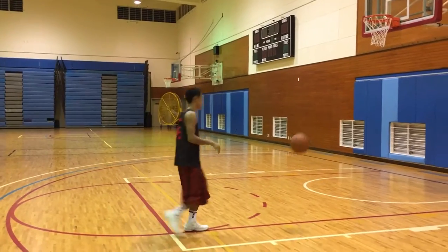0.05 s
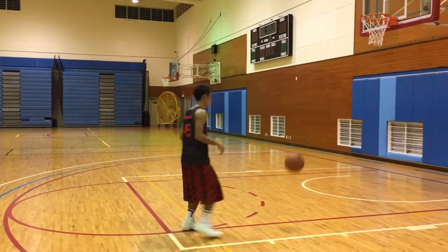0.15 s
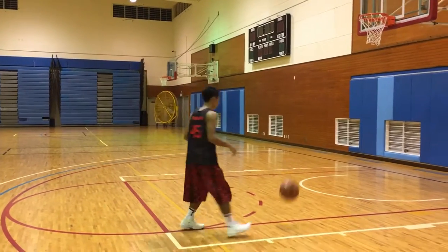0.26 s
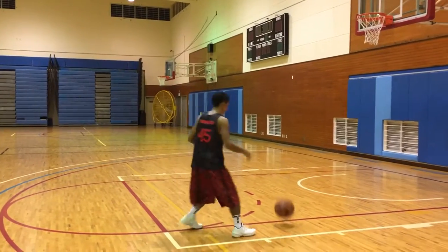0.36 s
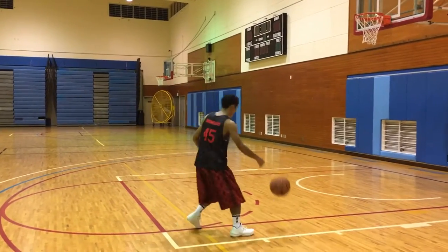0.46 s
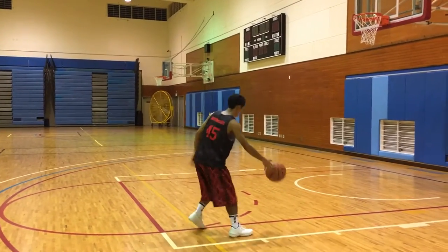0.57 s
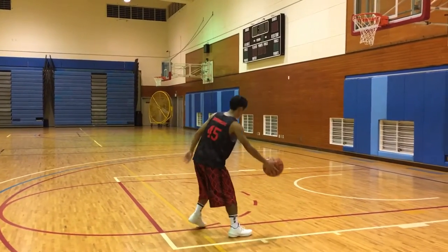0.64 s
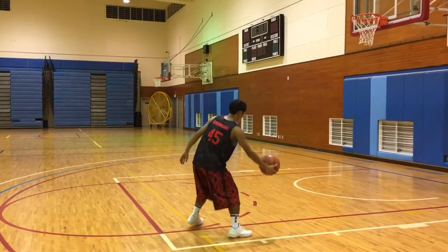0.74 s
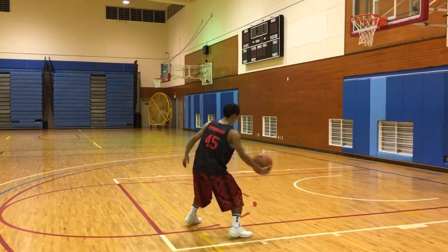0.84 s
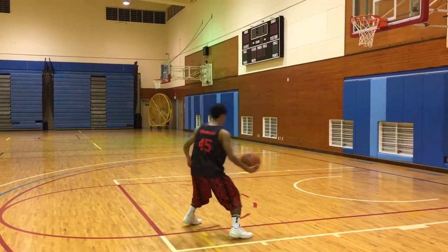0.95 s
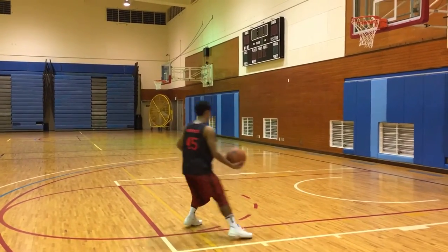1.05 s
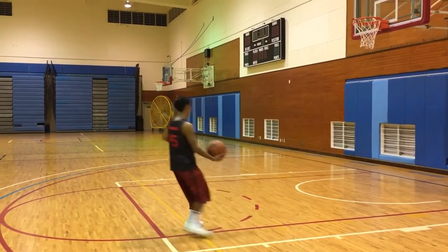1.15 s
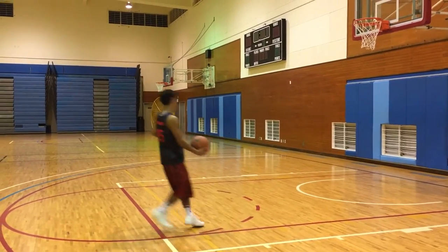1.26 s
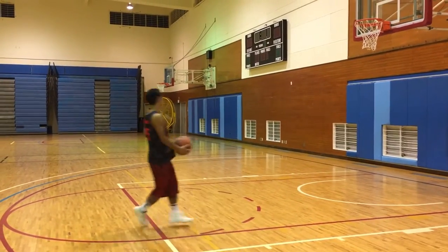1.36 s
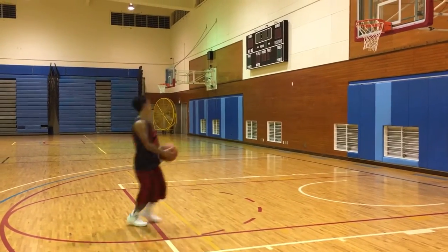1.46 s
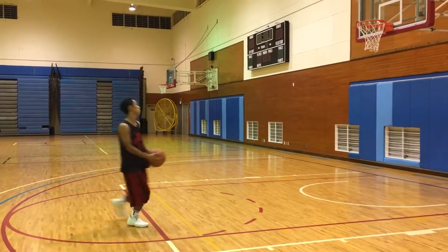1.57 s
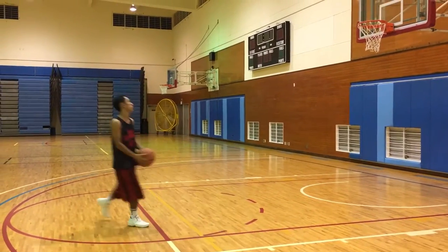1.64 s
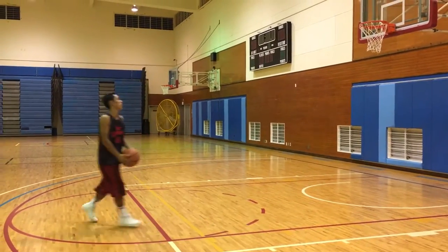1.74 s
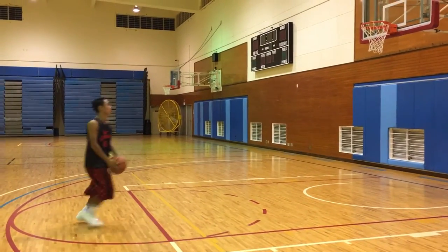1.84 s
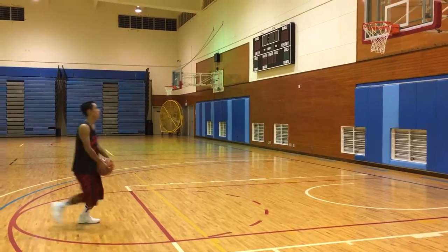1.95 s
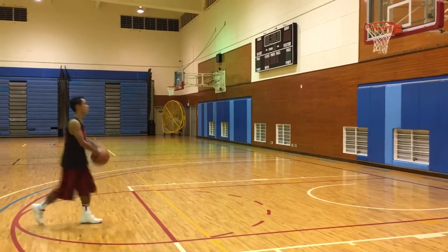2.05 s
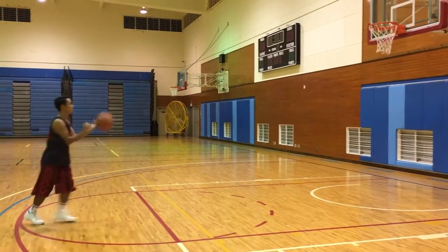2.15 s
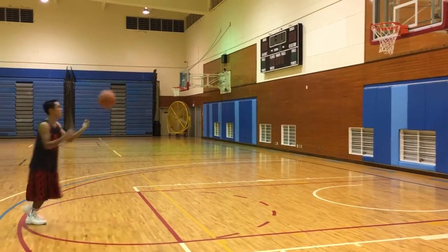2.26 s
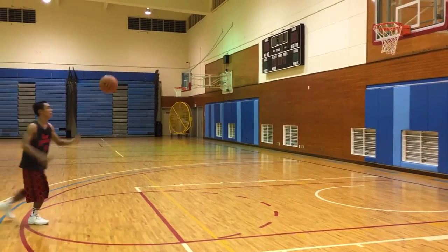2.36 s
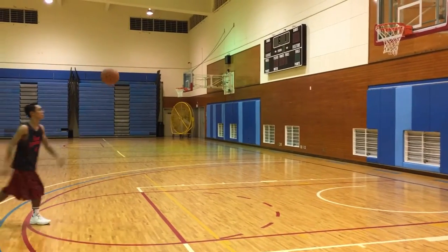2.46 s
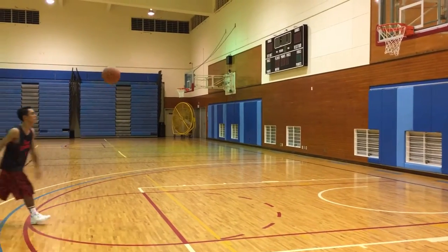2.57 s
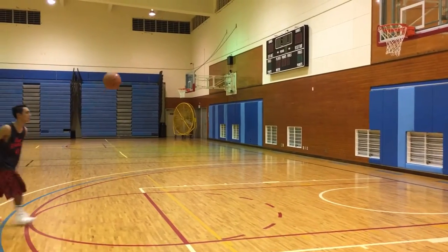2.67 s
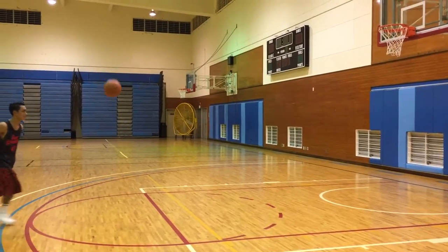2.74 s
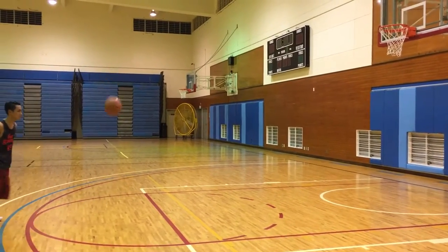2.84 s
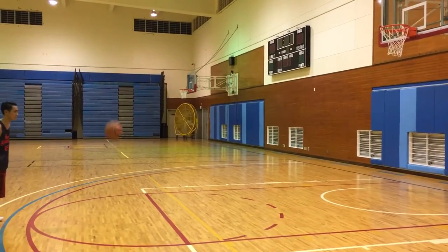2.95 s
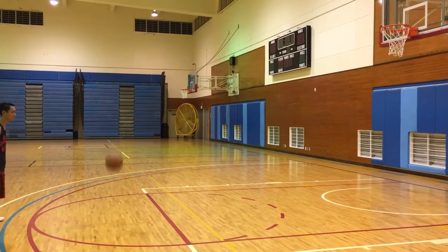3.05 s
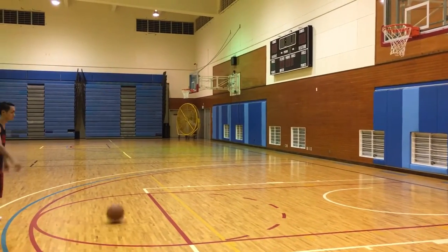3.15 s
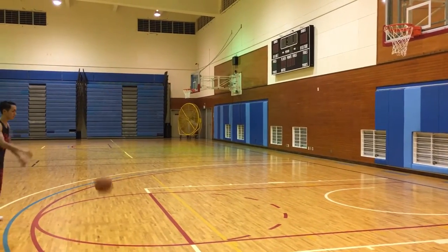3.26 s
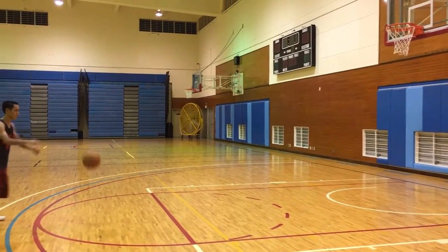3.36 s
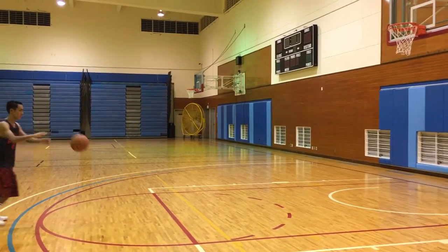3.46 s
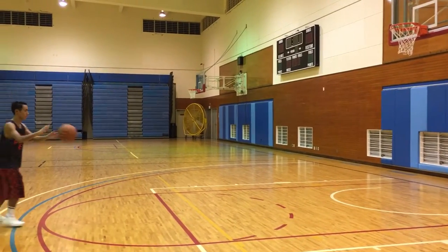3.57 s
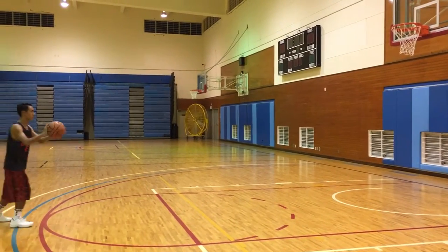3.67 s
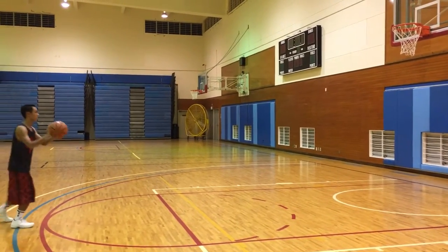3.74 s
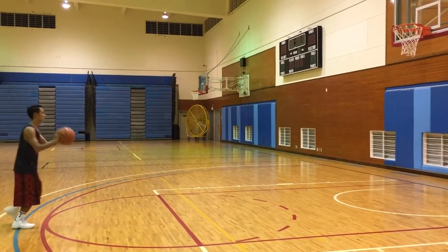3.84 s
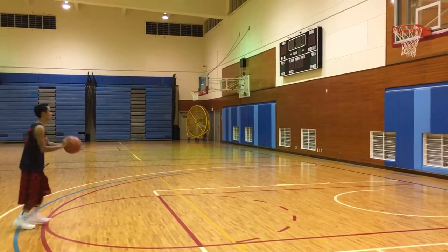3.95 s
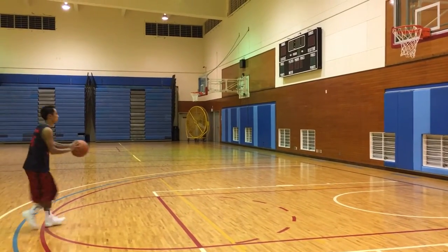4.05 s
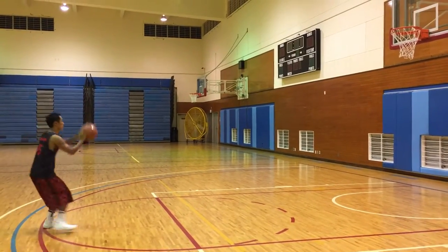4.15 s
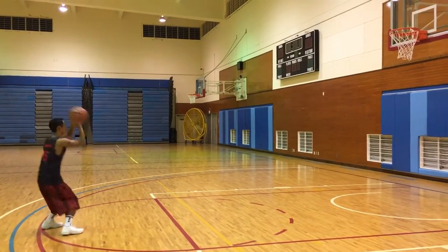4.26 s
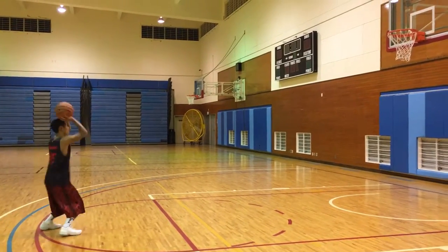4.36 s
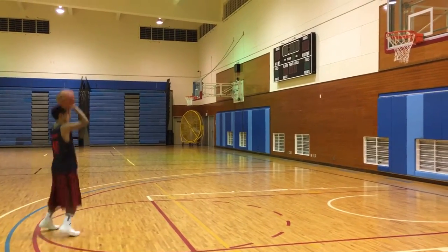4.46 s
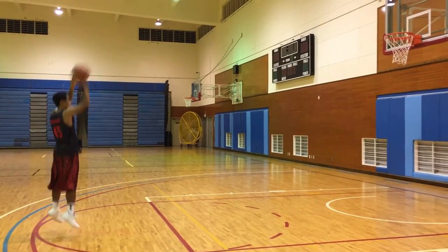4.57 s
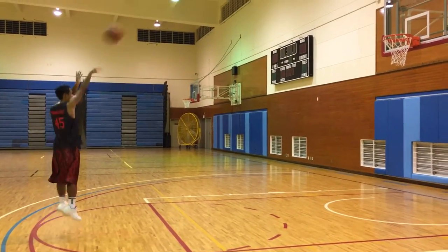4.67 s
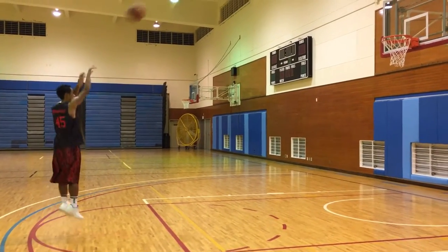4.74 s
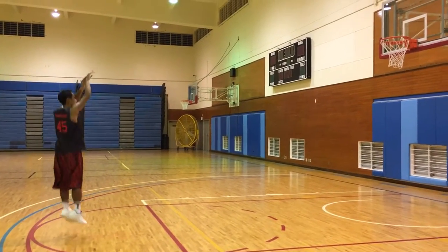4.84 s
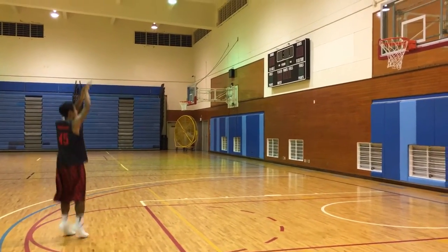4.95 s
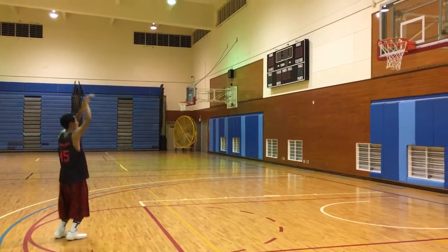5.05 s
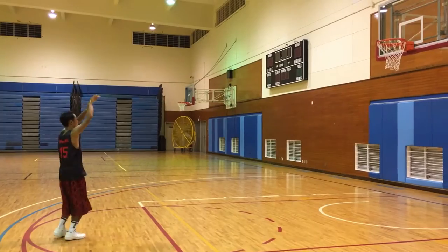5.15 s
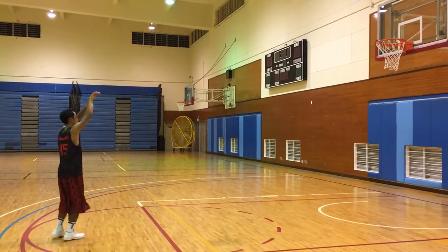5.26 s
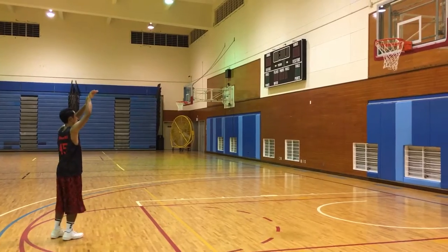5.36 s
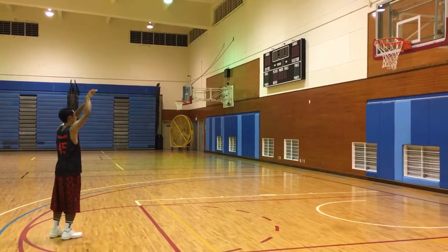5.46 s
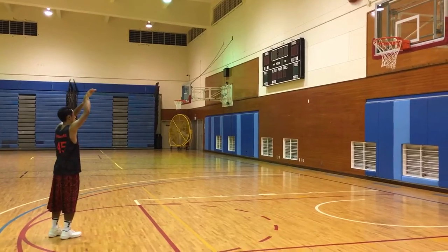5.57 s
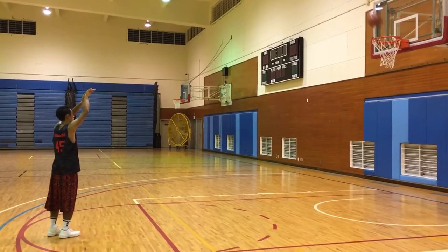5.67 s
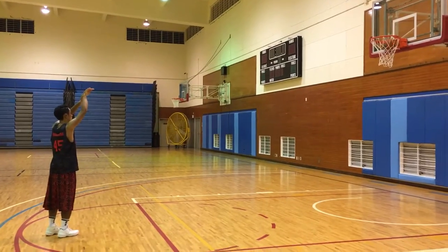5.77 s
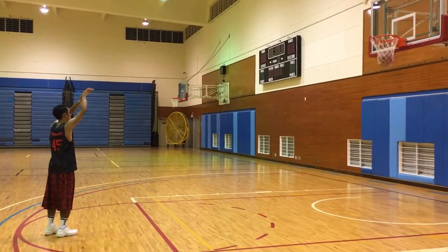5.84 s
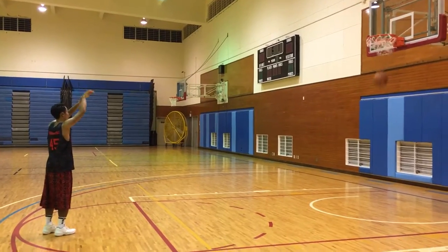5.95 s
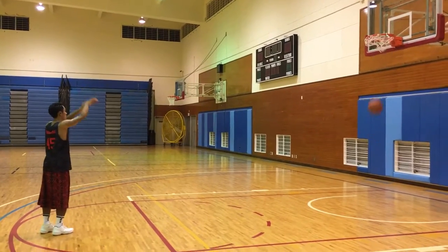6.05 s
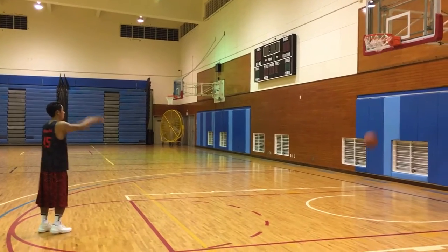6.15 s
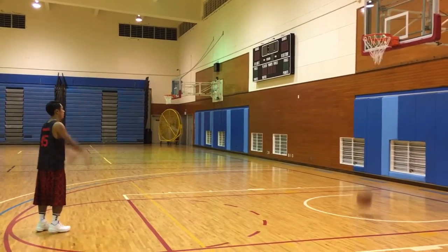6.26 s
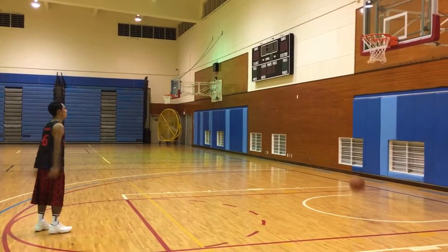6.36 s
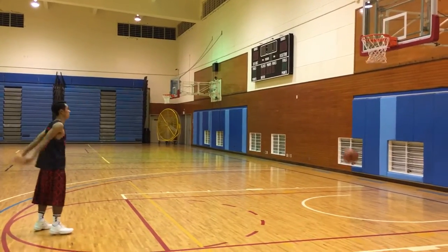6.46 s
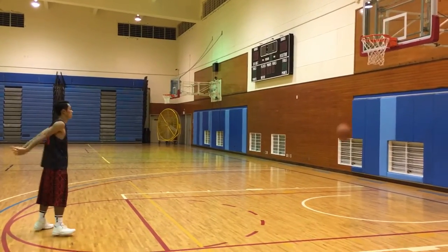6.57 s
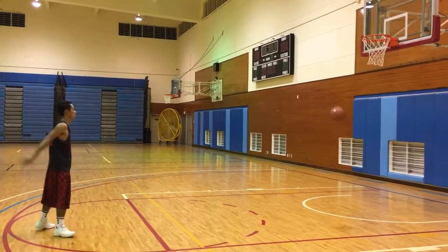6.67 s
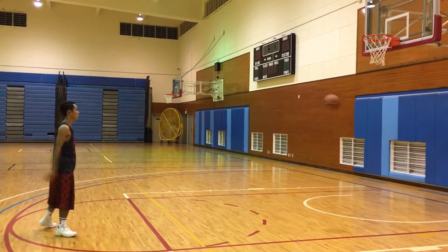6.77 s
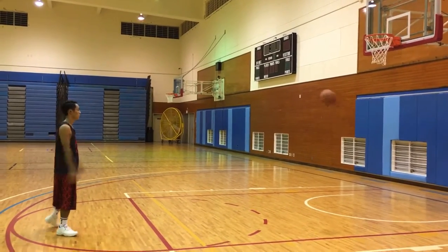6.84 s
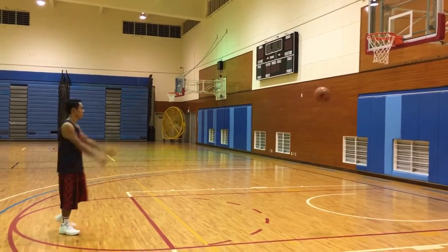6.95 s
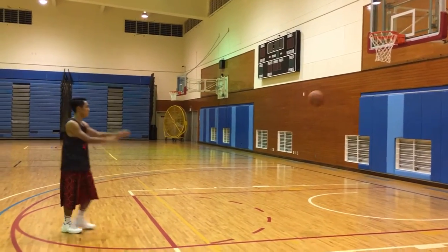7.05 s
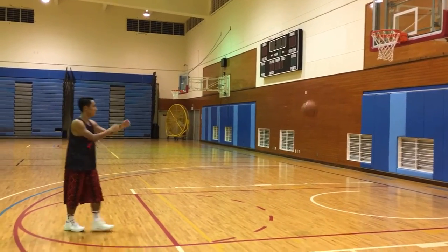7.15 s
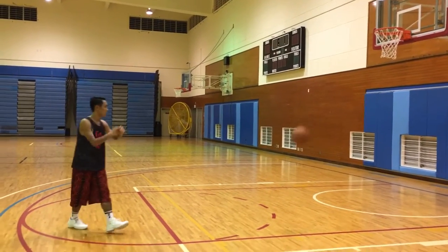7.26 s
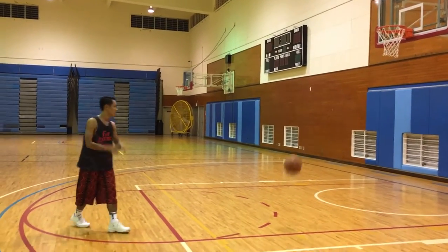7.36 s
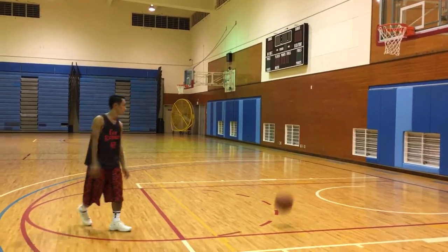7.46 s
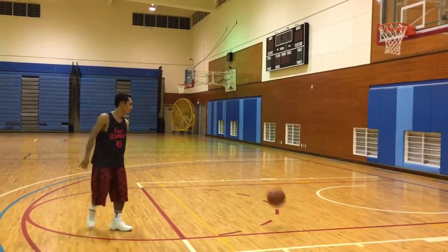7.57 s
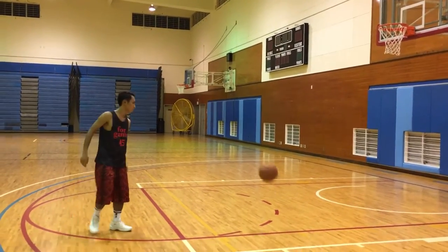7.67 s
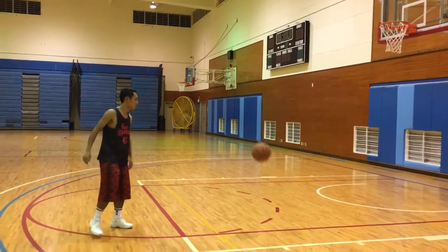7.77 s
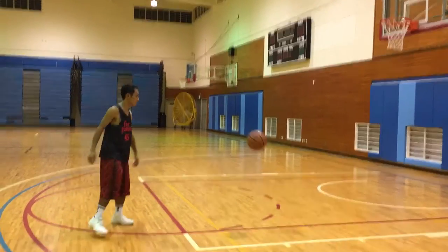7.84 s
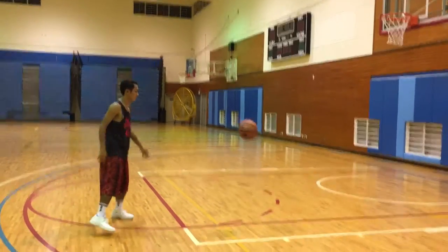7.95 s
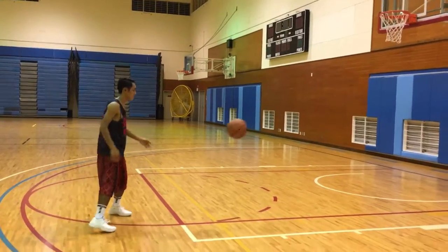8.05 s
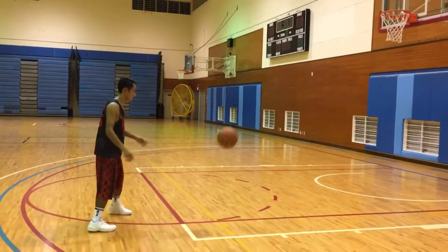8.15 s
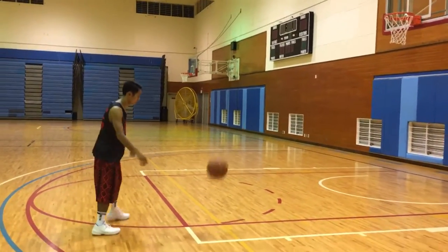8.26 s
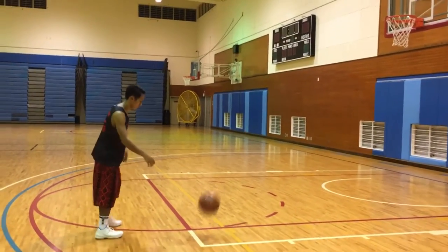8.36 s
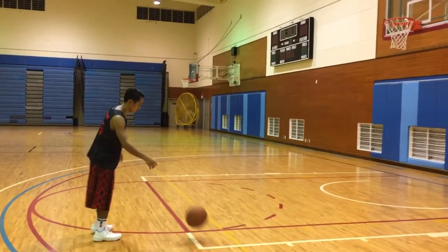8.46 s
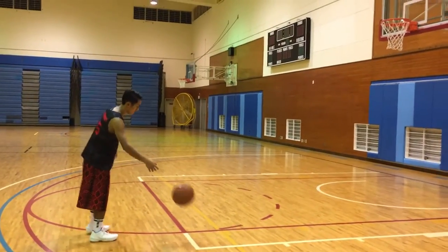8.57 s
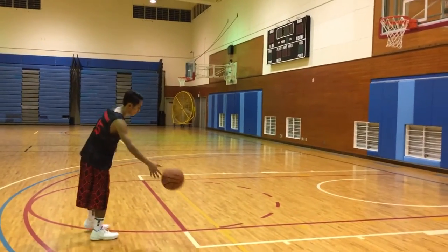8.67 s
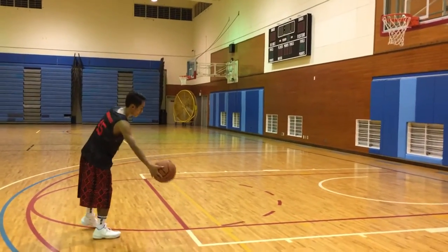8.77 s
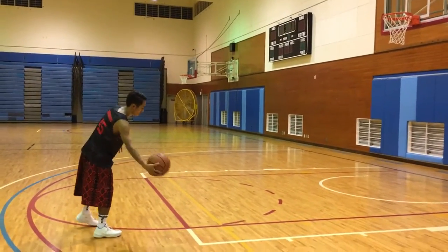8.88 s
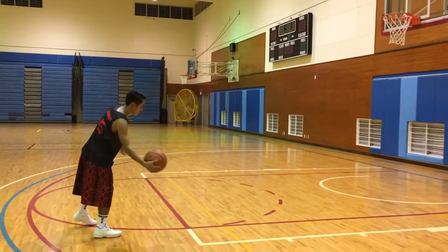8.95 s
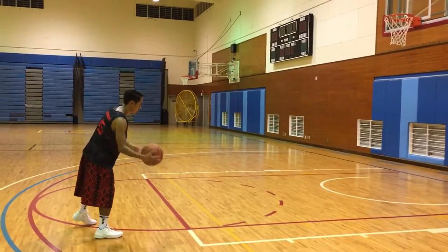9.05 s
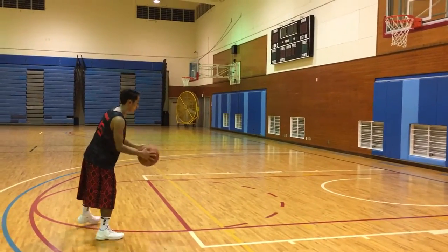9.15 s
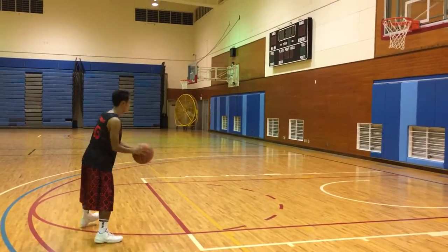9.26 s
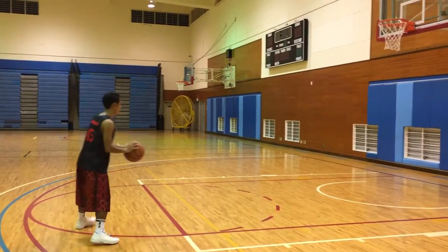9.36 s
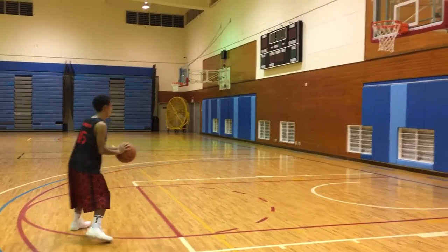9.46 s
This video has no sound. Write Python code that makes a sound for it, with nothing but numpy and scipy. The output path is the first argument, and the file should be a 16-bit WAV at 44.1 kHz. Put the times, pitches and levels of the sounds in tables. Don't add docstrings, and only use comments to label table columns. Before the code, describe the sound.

A large, empty-sounding gym with quiet fan hum and the fading tail of an earlier bounce. At 0.45 s a basketball slaps the wooden floor: a crisp smack, short hollow ping, and low boom falling in pitch, then wall echoes. Tiny ticks and scuffs lead to two firm palm or foot contacts around 1.5 s, with a very faint chirp. Light taps and small squeaks occur near 2.2 and 2.7 s. A stronger bounce at 3.29 s draws a big hall answer. A finger tick at 3.77 s and pat at 4.33 s precede a solid landing thump at 5.04 s. At 5.86 s the rim clanks softly and the net swishes. The hardest bounce cracks at 6.41 s, another follows at 7.62 s, and a softer one at 8.54 s just after a clear 0.1 s shoe squeak. A final pat at 9.26 s fades into reverberation.

```python
import sys
import numpy as np
from scipy import signal
from scipy.fft import rfft, irfft, next_fast_len
from scipy.io import wavfile

SR = 44100
rng = np.random.default_rng(int(sys.argv[2]) if len(sys.argv) > 2 else 0)


def gain_from_db(level_db):
    decades = np.asarray(level_db, float) / 20
    return 10 ** decades


def master(y):
    cut = np.clip(np.atleast_2d(y).T, -1, 1)
    pcm = np.round(cut * 32767)
    wavfile.write(sys.argv[1], SR, pcm.astype(np.int16))


N = 419391
LEAD_S = 1

# t/s, slap peak/dB, boards/dB, top edge re slap/dB, hall send/dB
BOUNCES = [
    (0.451, -14.5, -17.5, -4, -3.5),
    (3.285, -12, -17.5, -3, 4),
    (6.412, -8, -14, -9.5, -0.06),
    (7.62, -12, -16.5, 0, -1.5),
    (8.541, -14.5, -19, -9.5, -2),
]


def rms_one(x):
    return x / np.sqrt(np.mean(x ** 2) + 1e-20)


def clicks(times_s, db, lead_s=0):
    out = np.full(N + lead_s * SR, 1e-18)
    at = np.round((np.asarray(times_s) + lead_s) * SR).astype(int)
    out[at] = gain_from_db(np.asarray(db))
    return out


def ring(x, hz, t60_s):
    r = gain_from_db(-60 / (t60_s * SR))
    w = 2 * np.pi * hz / SR
    return signal.lfilter([0, np.sin(w)], [1, -2 * r * np.cos(w), r * r], x)


def band(x, low_hz, high_hz):
    sos = signal.butter(2, [low_hz, high_hz], "band", fs=SR, output="sos")
    return signal.sosfilt(sos, x)


def coloured(spectrum, size):
    hz, db = np.transpose(spectrum)[:2]
    log_hz = np.log(np.arange(1, size // 2 + 2) * SR / size)
    gain = gain_from_db(np.interp(log_hz, np.log(hz), db, left=-90, right=-90))
    return rms_one(irfft(rfft(rng.standard_normal(size)) * gain, size))


def level(rows):
    s, db = np.transpose(rows)
    return gain_from_db(np.interp(np.arange(N) / SR, s, db, left=-150, right=-150))


def swells(rows):
    fade_db = 17.5
    t = np.arange(0, N + 40, 40) / SR
    power = 0
    for s, db, rise_s, fall_s in rows:
        away = np.maximum((s - t) / rise_s, (t - s) / fall_s)
        power = power + gain_from_db(2 * (db - fade_db * away))
    return np.interp(np.arange(N) / SR, t, np.sqrt(power))


def add(out, at_s, x):
    at = round(at_s * SR)
    out[at:at + len(x)] += x[:len(out) - at]


def burst(t60_s, low_hz, high_hz):
    t = np.arange(2000) / SR
    x = band(rng.standard_normal(len(t)) * gain_from_db(-60 * t / t60_s), low_hz, high_hz)
    return x / np.abs(x).max()


def snap(hz):
    cycles = np.arange(-40, 60) / SR * hz
    return np.sin(2 * np.pi * cycles) * np.exp(-(cycles / .4) ** 2) * 1.5


def boards():
    t = np.arange(SR // 5) / SR
    turns = 68 * t + 108 * .007 * (1 - np.exp(-t / .007)) + .05
    passing = (1 - np.exp(-t / .004)) * np.exp(-(t / .055) ** 4)
    return np.sin(2 * np.pi * turns) * passing


def bounces():
    # f/Hz, level/dB, t60/s
    ball = [(1080, -3, .018), (1450, -4, .009), (1750, -7, .007), (2800, -14, .006), (4200, -17, .004)]
    # t/s, peak/dB, centre f/Hz
    wall = [
        (0.4768, -23, 2020),
        (1.587, -34, 4050),
        (3.3149, -13, 1970),
        (5.0737, -37.5, 2110),
        (6.428, -11.5, 2000),
        (6.4534, -37, 2380),
        (6.582, -28.5, 1960),
        (7.6441, -13.5, 2000),
        (8.575, -23, 2840),
    ]
    # delay/s, level re power sent/dB, centre f/Hz
    far_walls = [
        (.098, -37, 2250),
        (0.156, -21.5, 2410),
    ]
    # t/s, hall send/dB
    earlier = (-0.68, -6.5)
    knock_db, knock_follows = -8, 0.52

    s, slap_db, boards_db, edge_db, send_db = np.transpose(BOUNCES)
    spread_db = rng.normal(0, 1.5, (len(s), len(ball)))
    tilt = 0.12 * (edge_db + 8)
    out = np.zeros(N)
    for k, (hz, db, t60_s) in enumerate(ball):
        mode_db = slap_db + db + spread_db[:, k] + tilt * np.log2(hz / 1000)
        out += (-1) ** k * ring(clicks(s + 0.001352, mode_db), hz, t60_s)
    copies = list(wall)
    for at, slap, boom_db, edge, sent in BOUNCES:
        early = band(burst(0.022, 790, 3000)[500::-1], 600, 3200)
        add(out, at - 460 / SR, gain_from_db(slap - 24) * early)
        add(out, at + .0003, gain_from_db(slap + 2.5) * snap(2200))
        add(out, at + .001, gain_from_db(slap + edge - 13.5) * burst(.012, 6700, 15000))
        add(out, at + .001, gain_from_db(slap + edge) * burst(0.007, 4000, 11000))
        knock = band(burst(0.12, 110, 410), 140, 350)
        add(out, at + 0.0025, gain_from_db(knock_db + knock_follows * (slap + sent)) * knock)
        add(out, at + 100 / SR, gain_from_db(boom_db + 7.0) * boards())
        copies += [(at + late_s, slap + sent + db, hz) for late_s, db, hz in far_walls]
    for at, db, hz in copies:
        add(out, at, gain_from_db(db - 3) * snap(1.3 * hz))
        puff = burst(.008, .7 * hz, 2.2 * hz) + gain_from_db(-10) * burst(.006, 5000, 15000)
        add(out, at + .0008, gain_from_db(db - 4) * puff)
    send = clicks(s, slap_db + send_db - 13.0, LEAD_S)
    send += clicks([earlier[0]], [earlier[1] - 12.0], LEAD_S)
    return out, send


def hoop():
    # t/s, peak/dB
    hit = [
        (5.864, -25),
    ]
    # f/Hz, level/dB, t60/s
    modes = [(102.6, -10.5, 0.23), (156.5, -17, 0.033), (280, -33, 0.16), (370, -14, 0.014),
             (393, -7, 0.065), (449.7, -7.5, 0.22), (676, -15.5, 0.12), (1000, -20, 0.065),
             (1244, -7, 0.03), (1480, -10.5, 0.036), (1810, -10.5, 0.024), (9030, -38, .1),
             (10570, -52.5, .08)]
    # t/s, level/dB
    net = [
        (5.864, -41.5),
        (5.896, -44),
        (5.914, -32.5),
        (5.928, -39.5),
        (6.032, -52.5),
        (6.356, -67.5),
        (6.39, -62),
    ]
    # f/Hz, level/(dB per Hz)
    net_colour = [(120, -41.5), (200, -31), (401, -13), (777, -10.5), (1590, -11.5), (2170, -18),
                  (3130, -20), (9750, -24), (16000, -33.5)]
    at, db = hit[0]
    t = np.arange(SR // 8) / SR
    contacts = rng.random(len(t)) < 900.0 / SR
    blows = clicks([at], [0])
    add(blows, at, contacts * rng.standard_normal(len(t)) * gain_from_db(-12.0 - 800.0 * t))
    clank = gain_from_db(db) * sum(gain_from_db(g) * ring(blows, hz, t60_s) for hz, g, t60_s in modes)
    add(clank, at, gain_from_db(db - 19.0) * burst(.012, 2000, 14000))
    add(clank, at, gain_from_db(db - 3.5) * band(burst(0.058, 1000, 1280), 690, 1740))
    add(clank, at, gain_from_db(db - 8) * snap(2500))
    return clank + gain_from_db(1.0) * level(net) * coloured(net_colour, N)


def taps():
    # t/s, peak/dB, ping re peak/dB, thump/dB, top edge/dB
    contacts = [
        (1.492, -26.5, -6, -31, -67),
        (1.559, -26, -3, -21, -43),
        (2.16, -54.5, 6, -55, -49.5),
        (2.703, -43.5, -3.5, -56, -65),
        (2.975, -59, -7, -33, -69),
        (4.326, -36, -0.5, -32.5, -67),
        (5.039, -22.5, -4, -18.5, -59.5),
        (9.264, -28, 4, -30, -50),
    ]
    # t/s, peak/dB
    ticks = [(1.1243, -56), (1.146, -48.5), (1.3309, -62), (1.339, -47), (1.3628, -53), (1.3833, -53),
             (2.733, -47), (2.9084, -70), (3.123, -53), (3.767, -38), (4.5922, -49.5), (9.028, -69)]
    # f/Hz, level/dB, t60/s
    air_modes = [(740, -4, .016), (1030, -2, .018), (1300, -4, .012), (1620, -5, .011), (3300, -20, .008)]
    # t/s, level/dB, rise/s, fall/s
    scuffs = [(.406, -76, 0.035, 0.1), (1.12, -66.5, 0.0076, 0.039), (1.362, -66, 0.069, 0.33),
              (1.6, -62, 0.06, 0.31), (1.792, -71.5, .04, 0.3), (2.046, -73.5, 0.06, 0.17),
              (2.204, -70, 0.016, 0.14), (2.318, -81, 0.02, 0.21), (3.77, -53, 0.0026, 0.0088),
              (3.816, -61.5, .03, .03), (3.87, -71, .1, 0.054), (4.6, -72, .025, .035),
              (4.716, -75.5, .15, 0.13), (8.455, -69, 0.14, .01), (9.27, -59, 0.0042, .1),
              (9.4, -70, 0.28, .4)]
    # f/Hz, level/(dB per Hz)
    scuff_colour = [(410, -49.5), (700, -8), (1020, 3), (2370, -8.5), (2920, -13.5), (3550, -8.5),
                    (13700, -19.5), (16000, -35)]
    send_db = -17

    out, send = np.zeros(N), np.zeros(N)
    unit = np.eye(1, 2000, 40)[0]
    spread = band(unit, 220, 3500) + gain_from_db(9.5) * band(unit, 290, 780)
    for at, db, ping_db, thump_db, edge_db in contacts:
        pat = .6 * band(burst(.014, 400, 2300), 350, 2600)
        grip_db = rng.normal(0, 2, len(air_modes))
        ping = np.zeros(len(unit))
        for k, (hz, g, t60_s) in enumerate(air_modes):
            ping += (-1) ** k * gain_from_db(g + grip_db[k]) * ring(unit, hz, t60_s)
        add(out, at, gain_from_db(db) * (pat + gain_from_db(ping_db) * ping))
        add(out, at + 0.0028, gain_from_db(edge_db + 8.5) * burst(0.018, 2100, 9500))
        thump = band(ring(unit, 248, 0.023), 150, 640)
        add(out, at + 0.001, gain_from_db(thump_db + 4.0) * thump)
        add(send, at, gain_from_db(db + send_db) * spread)
    for at, db in ticks:
        add(out, at, gain_from_db(db) * burst(0.0086, 2300, 12600))
    grit = gain_from_db(0.74 * rms_one(band(rng.standard_normal(N), 11, 240)))
    slide = gain_from_db(7.5) * swells(scuffs) * rms_one(grit * coloured(scuff_colour, N))
    return out + slide, send + gain_from_db(-59.5) * slide


def squeaks():
    # t/s, length/s, pitch f/Hz, final level/dB, overtone boost/dB
    slips = [
        (1.328, 0.015, 3570, -71, -8),
        (1.557, 0.0065, 3310, -44, -12),
        (1.791, 0.012, 2770, -57, 1),
        (1.799, .011, 3015, -56, -3.5),
        (2.163, 0.0094, 2630, -51, 1.5),
        (2.702, 0.0076, 3900, -61, -17),
        (2.734, 0.0063, 3880, -50, -12),
        (8.463, .101, 3003, -30.5, -5),
    ]
    overtones_db = [-2, -7, -19.5, -29, -30]
    # delay/s, level/dB
    wall_echoes = [(.031, -7), (.115, -9), (.161, -13), (.195, -13)]
    bite_share, bite_s, sag_hz_per_s = .08, 0.0022, 1700
    grip_s, swell_db_per_s = .004, 117
    bite_db, bite_fade_s, flutter_db = 9, 0.0086, 2.5

    out = np.zeros(N)
    for s, length_s, first_hz, db, boost_db in slips:
        t = np.arange(0, length_s, 1 / SR)
        shake = rms_one(band(rng.standard_normal(8000), 43, 180))[-len(t):]
        flutter = rms_one(band(rng.standard_normal(8000), 43, 180))[-len(t):]
        hz = first_hz - sag_hz_per_s * t + bite_share * first_hz * np.exp(-t / bite_s)
        waver = 1 + .0006 / length_s ** .65 * shake
        turns = np.cumsum(hz * waver) / SR
        tone = np.zeros(len(t))
        for k, g in enumerate(overtones_db):
            tone += gain_from_db(g + boost_db * (k > 0)) * np.sin(2 * np.pi * (k + 1) * turns)
        grip = np.minimum(1, np.minimum(t, length_s - t) / grip_s) ** 2
        gain_db = db - swell_db_per_s * (length_s - t)
        gain_db += bite_db * np.exp(-t / bite_fade_s) + flutter_db * flutter
        add(out, s, np.sqrt(2) * tone * grip * gain_from_db(gain_db))
    echoes = np.zeros(N)
    for late_s, db in wall_echoes:
        add(echoes, late_s, gain_from_db(db) * out)
    return out, band(echoes, 1000, 12000)


def hall():
    # f/Hz, level/(dB per Hz), t60/s
    decay = [(98, 5, 3.4), (183, 13.5, 2.5), (274, 8, 2.84), (578, -13, 3.46), (1060, -8.5, 2.48),
             (2000, -8, 2.14), (3500, -15.5, 1.99), (6020, -22, 1.54), (10000, -31, 1.5),
             (15000, -25.5, 0.62)]
    t = np.arange(3 * SR) / SR
    hz, db, t60_s = np.transpose(decay)
    edges_hz, tail = np.geomspace(80, 16500, 20), np.zeros(len(t))
    for low, high in zip(edges_hz, edges_hz[1:]):
        at = np.log(low * high) / 2
        gain_db = np.interp(at, np.log(hz), db) - 60 * t / np.interp(at, np.log(hz), t60_s)
        tail += gain_from_db(gain_db) * band(rng.standard_normal(len(t)), low, high)
    grain = rms_one(band(rng.standard_normal(len(t)), 15, 270))
    tail *= gain_from_db(4 * grain * np.exp(-t / .3))
    return tail * (1 - np.exp(-t / .012))


def boom():
    # f/Hz, level/(dB per Hz)
    boom_colour = [(12, -38.5), (20, 1.5), (39, -6.5), (59, 5), (97, -6.5), (160, -15), (210, -63.5),
                   (350, -120)]
    # delay/s, level re boards/dB, rise/s, fall/s
    returns = [
        (0.046, -1, 0.016, 0.053),
        (0.21, -9.5, 0.21, 0.11),
        (0.32, -9.5, 0.26, 0.1),
        (0.644, -15.5, 0.14, 0.24),
        (.12, -6.5, .06, 1),
    ]
    # t/s, level/dB, rise/s, fall/s
    shakes = [
        (.06, -29, 0.18, 0.67),
        (1.53, -30.5, 0.026, 0.22),
        (2.73, -32, 0.13, 0.08),
        (5.07, -27.5, 0.024, 0.18),
        (5.37, -32.5, 0.16, 0.078),
        (5.9, -19, .03, 0.024),
        (5.95, -44, .05, 0.55),
    ]
    rumble_db, evenness = -48.5, 0.2
    x = coloured(boom_colour, N)
    envelope = np.abs(signal.hilbert(x, next_fast_len(N)))[:N]
    after = []
    for s, slap_db, boards_db, *rest in BOUNCES:
        after += [(s + late_s, boards_db + db, rise_s, fall_s) for late_s, db, rise_s, fall_s in returns]
    gain = np.hypot(swells(after + list(shakes)), gain_from_db(rumble_db))
    return gain * rms_one(x / (envelope + 0.15) ** evenness)


def ventilation():
    # f/Hz, level/(dB per Hz)
    air = [(59, -44.5), (100, 5), (129, 5), (202, -7), (373, -2.5), (442, -15.5), (752, -28.5), (1650, -33),
           (4870, -47), (5650, -42), (10500, -49), (15000, -46), (16000, -79.5)]
    return gain_from_db(-49.5) * coloured(air, N)


def scene():
    ball, send = bounces()
    basket = hoop()
    touch, touch_send = taps()
    soles, echoes = squeaks()
    bright = signal.lfilter([1, -.7], [1], band(soles, 1000, 10500))
    send[LEAD_S * SR:] += touch_send + gain_from_db(-20.0) * bright + gain_from_db(-31.5) * basket
    tail = signal.fftconvolve(send, hall())[LEAD_S * SR:][:N]
    direct = ball + touch + soles + echoes + basket
    return (direct + tail + boom() + ventilation())[None]


def band_limit(x):
    return signal.sosfilt(signal.butter(12, 16860, fs=SR, output="sos"), x)


def record(dry):
    dry = signal.sosfilt(signal.butter(2, 38, "high", fs=SR, output="sos"), dry)
    dry = signal.sosfilt(signal.cheby2(10, 60, 17000, fs=SR, output="sos"), dry)
    return band_limit(dry)


dry = scene()
out = record(dry)
master(out)
```